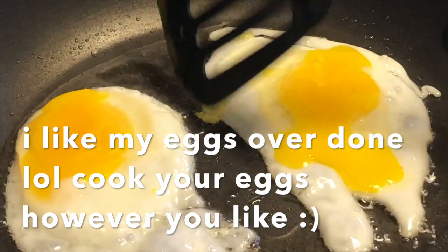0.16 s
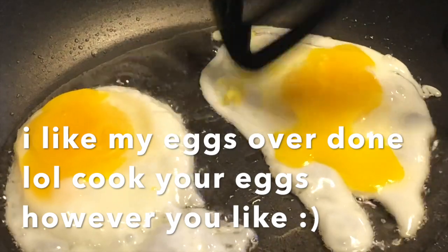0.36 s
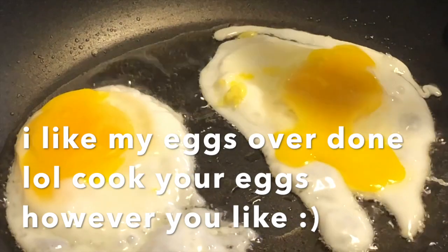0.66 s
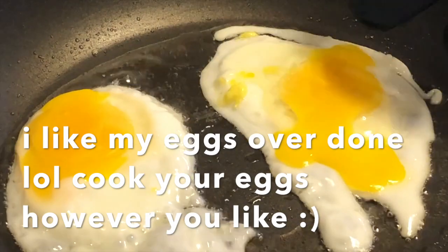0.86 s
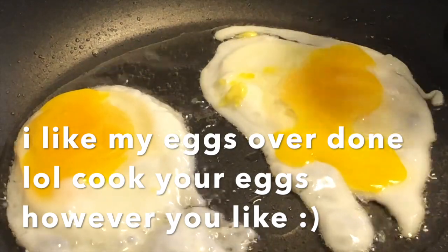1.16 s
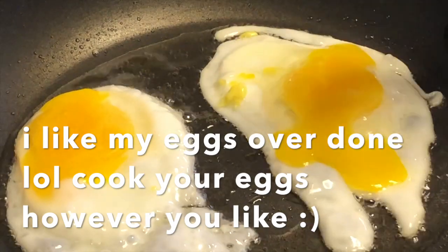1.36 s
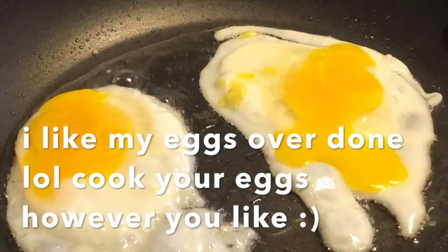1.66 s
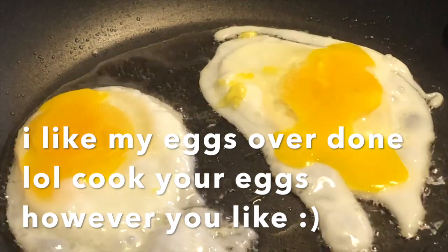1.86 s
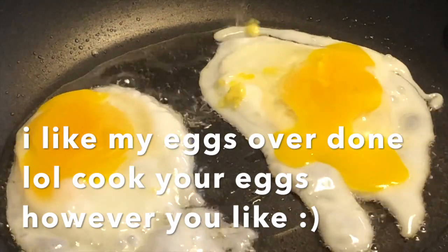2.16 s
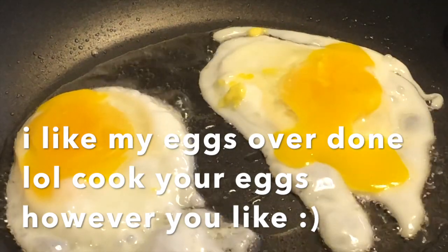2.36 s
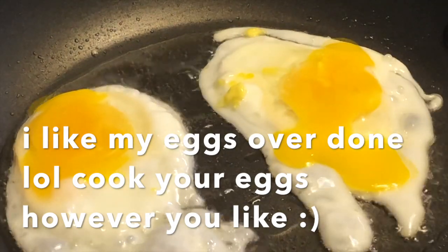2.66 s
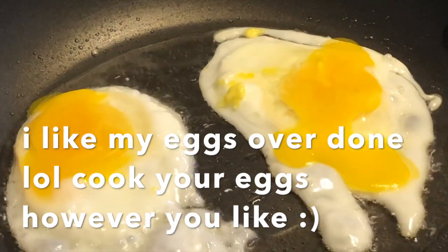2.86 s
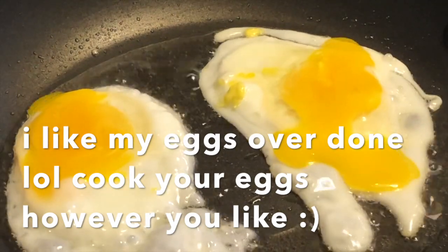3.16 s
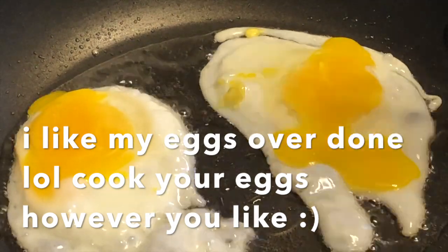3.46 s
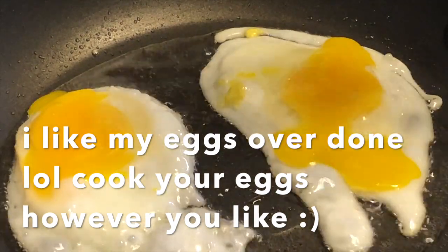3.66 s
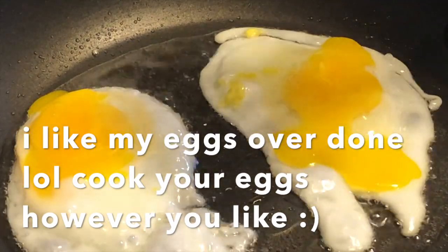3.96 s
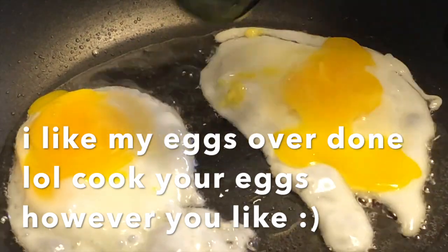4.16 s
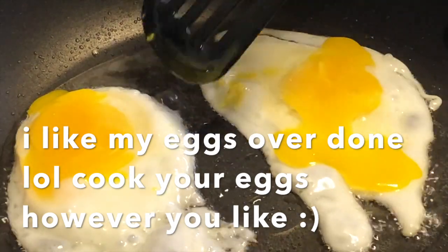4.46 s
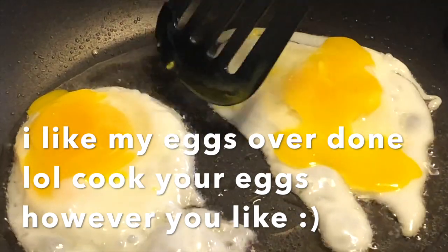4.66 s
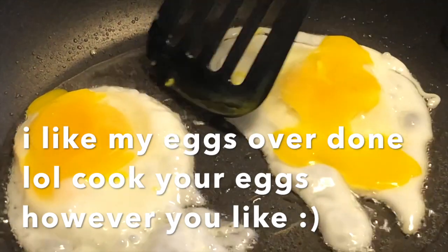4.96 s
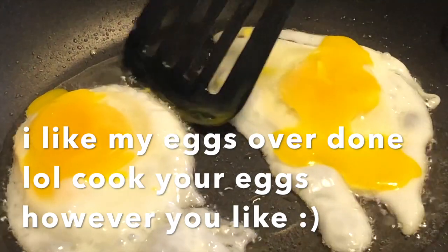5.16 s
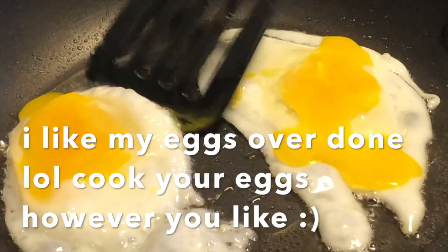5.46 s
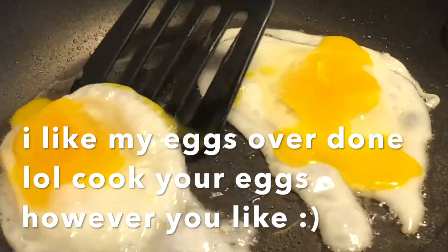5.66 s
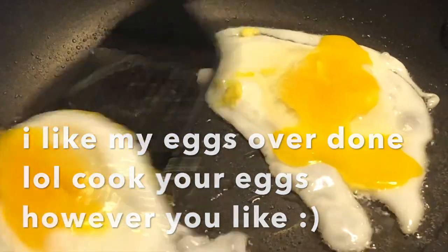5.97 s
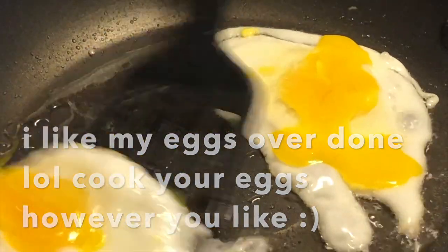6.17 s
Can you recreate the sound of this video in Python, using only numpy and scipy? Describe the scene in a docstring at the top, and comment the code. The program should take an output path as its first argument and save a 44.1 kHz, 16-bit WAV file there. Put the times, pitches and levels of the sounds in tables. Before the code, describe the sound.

Close, steady frying of eggs with sharp crackles and spits, then soft knocks and wet scrapes of a plastic spatula.

```python
"""Small kitchen: two eggs fry in a little oil, heard close up.
Tiny bubbles fizz and tick, larger ones pop; trapped water spits out as short steam jets that ring the pan.
A plastic spatula taps the pan and shoves under an egg.
Mains hum and room rumble lie beneath; the level dips briefly midway."""
import sys
import numpy as np
from scipy import signal
from scipy.fft import rfft, irfft, next_fast_len
from scipy.io import wavfile
from scipy.ndimage import uniform_filter1d, map_coordinates

SR = 44100
rng = np.random.default_rng(int(sys.argv[2]) if len(sys.argv) > 2 else 0)


def to_wav(sig):
    """Store sig (one row per channel, or 1-D mono) as 16-bit WAV at the path in sys.argv[1].

    Samples outside -1..1 are clipped; the rate is SR.
    """
    pcm = np.clip(np.atleast_2d(sig), -1, 1) * 32767
    pcm = np.round(pcm).astype(np.int16)
    wavfile.write(sys.argv[1], SR, pcm.T)  # frames by channels


N = 278690

# frying strength: t/s, bubbling/dB, fizz/dB
FRY_LEVELS = [(0.0, -57, -56), (0.21, -56.5, -56.5), (1.07, -59, -56), (2.52, -56.5, -56),
              (3.03, -61, -60.5), (3.82, -55.5, -55), (4.21, -57, -57), (5.32, -59, -57),
              (5.53, -55.5, -55), (5.81, -56, -54), (6.09, -53.5, -51), (6.32, -52.5, -53)]
# spectra: f/Hz, relative level/dB
SIMMER_SPECTRUM = [(200, -13), (500, -5.5), (900, -2), (2500, 0), (4000, -11), (7000, -2.5), (16000, -13)]
FIZZ_SPECTRUM = [(1000, -6), (3500, 4), (5200, 3.5), (7000, -3.5), (9500, 6), (12000, 2.5), (15000, 6),
                 (16000, -5.5)]
RUMBLE_SPECTRUM = [(20, -45), (40, -13), (70, -9), (110, -4), (150, 2), (200, -3.5), (320, -5), (500, -9.5),
                   (1000, -16.5), (4000, -31)]
JET_SPECTRUM = [(30, -31), (100, -44), (400, -22.5), (800, -17.5), (1500, -12), (2100, -3), (2800, -1),
                (3500, -7), (6000, -2), (8800, -3), (11000, -3), (13000, -13), (16000, 4.5)]
SNAP_SPECTRUM = [(100, -45), (800, -22), (4000, -7), (7000, 0), (10500, 0), (16000, -5)]
RUB_SPECTRUM = [(40, -30), (95, -9), (145, 0), (200, -5), (400, -6), (700, -18), (3000, -40)]
REVERB_SPECTRUM = [(300, 6), (3000, 1.5), (9000, -2.0), (15000, 1.5)]
# room decay: f/Hz, t60/s
ROOM_DECAY = [(200, 0.09), (800, 0.23), (2500, 0.24), (8000, 0.29), (15000, 0.14)]
# loud bursting bubbles, plus at 0.7393 s the crack that opens the steam jet just after: t/s, body/dB, f/Hz,
# t60/s, snap/dB
LOUD_POPS = [(0.0661, -43, 2320, 0.043, -54), (0.1393, -47.5, 5400, 0.011, -52.5),
             (0.2666, -43.5, 1410, 0.041, -63), (0.2669, -44.5, 778, 0.13, -70),
             (.3135, -72, 1420, .025, -49.5), (0.3466, -49, 1910, 0.014, -73),
             (0.5696, -45.5, 5130, 0.013, -68), (0.6306, -44.5, 970, 0.014, -70),
             (.6403, -47, 3100, .019, -50), (0.6475, -44.5, 1330, 0.051, -47),
             (0.7309, -39.5, 3770, 0.0083, -65), (.7393, -55, 2420, .01, -38),
             (0.9922, -47, 5180, 0.015, -72), (1.023, -51.5, 1980, 0.01, -54),
             (1.1347, -49, 3280, 0.0061, -63), (1.1552, -73, 5600, .016, -46.5),
             (1.598, -46, 1670, 0.02, -50), (1.633, -49.5, 4300, 0.013, -54),
             (1.658, -46.5, 4440, 0.012, -69), (1.8082, -42.5, 1697, 0.029, -43),
             (1.814, -44.5, 1770, .015, -47.5), (1.8952, -45.5, 850, 0.02, -45.5),
             (2.0024, -43, 1520, 0.002, -54), (2.0252, -47.5, 6860, 0.018, -63),
             (2.2192, -33, 1800, .006, -53), (2.2498, -54, 1800, .007, -37.5),
             (2.33, -48.5, 1630, 0.022, -67), (2.3539, -46.5, 2220, 0.022, -52),
             (2.3751, -43, 2120, 0.0057, -66), (3.3868, -40.5, 1590, 0.0029, -60),
             (3.3871, -44, 4800, 0.0049, -70), (3.405, -45.5, 6340, 0.023, -62),
             (3.429, -46, 5100, .01, -50), (3.4392, -38.5, 6760, 0.0068, -44),
             (3.4803, -43.5, 1700, 0.034, -61), (3.6399, -49, 1800, 0.0078, -50),
             (3.7904, -44.5, 5340, 0.026, -52), (3.8325, -40, 1560, 0.0039, -40.5),
             (3.9131, -40, 1770, 0.018, -34), (4.404, -47.5, 5000, .004, -57),
             (4.505, -47.5, 1710, .006, -48.5), (4.538, -49, 2720, 0.013, -72),
             (4.6086, -39.5, 2420, 0.035, -64), (4.8075, -69, 5540, .009, -45),
             (4.867, -47, 5300, 0.012, -33.5), (5.5952, -50.5, 1630, 0.013, -48.5),
             (5.6723, -47, 6900, .015, -67), (5.9651, -50, 2290, .011, -49),
             (6.2488, -34.5, 2500, 0.0018, -42.5)]
# sympathetic pan modes: f/Hz, width/Hz, gain/dB
PAN_MODES = [(902, 7.6, 16), (2150, 11, 11.5), (2660, 30, -24), (2827, 28, -45), (5043, 38, 15.5),
             (6640, 40, 9), (7600, 40, -21), (7800, 32, -27), (9200, 56, 16), (9183, 40, -20),
             (11400, 78, 9)]
# steam jets: t/s, length/s, level/dB, extra treble/dB, vent/Hz
STEAM_JETS = [(0.7395, .016, -21.5, 11, 3700), (2.219, 0.01, -26.5, -24, 5850),
              (2.225, 0.0073, -21.5, 7, 10400), (3.431, 0.015, -37, -11, 9350),
              (3.451, 0.0084, -32.5, 4, 6550), (3.479, 0.0054, -36.5, 5, 4770),
              (5.4171, .0053, -13.5, 1, 9000), (5.423, 0.011, -20.5, 13, 6800),
              (5.439, 0.013, -24, -11, 4300), (5.502, 0.0067, -31, -21, 5250),
              (5.913, 0.007, -37.5, -18, 2900), (5.93, 0.016, -40, -2, 8300), (6.02, 0.019, -31, -5, 9800),
              (6.102, 0.0028, -13, 6, 8500), (6.106, 0.027, -33.5, -9, 1780),
              (6.15, 0.003, -30.5, 10, 9000)]
# spatula on pan: t/s, level/dB, brightness/Hz
SPATULA_TAPS = [(5.3037, -38, 1600), (5.3098, -34.5, 1330), (5.4237, -38, 840), (5.4405, -42.5, 294),
                (5.5095, -51, 726), (5.535, -46.5, 135), (5.79, -43, 135), (6.1045, -35.5, 1250),
                (6.106, -41, 500), (6.117, -36.5, 1470), (6.2495, -53, 400)]
# modes of a tap: f/Hz, relative level/dB, t60/s
TAP_MODES = [(141.6, 1.5, 0.24), (310, -11, 0.058), (490, -25, 0.051), (842, -5, 0.06), (1160, -14, 0.026),
             (1310, -9, 0.053), (1620, -12, 0.078), (2780, 1, 0.027), (3553, -7, 0.023)]
# spatula under egg: t/s, length/s, rub/dB, scrape/dB
SPATULA_STROKES = [(5.437, 0.028, -59, -62), (5.51, 0.056, -52.5, -55), (5.69, 0.069, -57.5, -54.5),
                   (5.772, 0.1, -54.5, -61), (5.98, 0.05, -66, -51), (6.12, 0.04, -65, -41)]

TOP_HZ = 15800


def amp(db):
    """dB to gain."""
    return 10 ** (np.asarray(db) / 20)


def unit(x):
    """Scale to rms 1."""
    return x / np.sqrt(np.mean(x ** 2) + 1e-20)


def along(points, hz):
    """Interpolate (f/Hz, value) points on a log axis."""
    f, v = np.transpose(points)
    return np.interp(np.log(hz + 1), np.log(f + 1), v)


def curves(rows):
    """Per-sample curve for each column after t/s."""
    times_s, *columns = np.transpose(rows)
    return [np.interp(np.arange(N) / SR, times_s, column) for column in columns]


def wobble(rate_hz):
    """Smooth random curve, knots at rate_hz."""
    knots = rng.standard_normal(int(N * rate_hz / SR) + 4)
    return map_coordinates(knots, [np.arange(N) * rate_hz / SR])


def coloured(x, gain_db):
    """Minimum-phase filter with response gain_db(hz)."""
    n = 2 * next_fast_len(len(x) // 2 + 2048)
    cepstrum = irfft(np.log(amp(gain_db(np.fft.rfftfreq(n, 1 / SR)))), n)
    cepstrum[1:n // 2] *= 2
    cepstrum[n // 2 + 1:] = 0
    return irfft(rfft(x, n) * np.exp(rfft(cepstrum)), n)[:len(x)]


def noise(spectrum):
    """Shaped noise, rms 1."""
    return unit(coloured(rng.standard_normal(N), lambda hz: along(spectrum, hz)))


def add(track, start_s, sound):
    """Mix sound into track."""
    part = track[max(round(start_s * SR), 0):][:len(sound)]
    part += sound[:len(part)]


def blip(x, db, window_s=0.01):
    """Scale x to the energy of db rms held for window_s."""
    return x * amp(db) * np.sqrt(window_s * SR / (np.sum(x ** 2) + 1e-20))


def grains(per_s, pitch_hz, log_spread, t60_cycles, scatter_db):
    """Cloud of damped sines, rms 1; scatter_db makes a few stand out."""
    when, pitch_a, pitch_b, strength = rng.random((int(per_s * N / SR), 4)).T[:, :, None]
    hz = np.clip(pitch_hz * np.exp(log_spread * (pitch_a + pitch_b - 1)), 200, TOP_HZ)
    size = amp(-scatter_db * np.log(0.04 + 0.96 * strength))
    k = np.arange(384)
    turns = hz * k / SR
    swell = 1 - np.exp(-turns)
    waves = size * np.sin(2 * np.pi * turns) * swell * amp(-60 * turns / t60_cycles)
    samples = (when * N).astype(int) + k
    return unit(np.bincount(samples.ravel(), waves.ravel(), N)[:N])


def sizzle(bubbling_trim_db=0.3, fizz_trim_db=-0.16):
    """Bubbles simmer under the whites; fine droplets fizz in the open oil."""
    bubbling_db, fizz_db = curves(FRY_LEVELS)
    boil = wobble(12)
    simmer = noise(SIMMER_SPECTRUM) * amp(-4.5 + 2.0 * boil)
    bubbles = grains(per_s=380, pitch_hz=2310, log_spread=1.363, t60_cycles=18, scatter_db=5.5)
    bubbles = (bubbles + amp(-6.5) * kitchen(bubbles)) * amp(-4.5 + 0.6 * boil)
    flicker_db = 0.8 * boil + 0.5 * wobble(45)
    hiss = noise(FIZZ_SPECTRUM) * amp(flicker_db - 0.45)
    ticks = grains(per_s=420, pitch_hz=9900, log_spread=0.95, t60_cycles=4.6, scatter_db=10)
    bubbling = amp(bubbling_db + bubbling_trim_db) * (simmer + bubbles)
    fizz = amp(fizz_db + fizz_trim_db) * (hiss + amp(-8.5) * ticks)
    return bubbling + fizz


def kitchen(x, build_s=0.0038):
    """Reverb of a small hard room; lows and top treble die first."""
    hz, t, spectra = signal.stft(rng.standard_normal(SR // 2), SR, nperseg=256)
    colour = amp(along(REVERB_SPECTRUM, hz))[:, None]
    decay = amp(-60 * t / along(ROOM_DECAY, hz)[:, None])
    tail = signal.istft(spectra * colour * decay, SR, nperseg=256)[1]
    tail *= 1 - np.exp(-np.arange(len(tail)) / SR / build_s)
    return signal.fftconvolve(x, tail / np.linalg.norm(tail))[:N]


def hum_and_rumble(mains_hz=59.9, hum_db=-58.5, rumble_db=-59.5, dip_at_s=2.92, dip_width_s=0.15):
    """Mains hum and low room noise; both dip briefly, the hum deeper."""
    t = np.arange(N) / SR
    dip = np.exp(-np.abs(t - dip_at_s) / dip_width_s)
    hum = amp(hum_db - 21 * dip + 0.37 * wobble(6.5)) * np.sin(2 * np.pi * mains_hz * t)
    rumble = amp(rumble_db - 6.5 * dip + 1.9 * wobble(7.8)) * noise(RUMBLE_SPECTRUM)
    return hum + rumble


def pop(body_db, hz, t60_s, snap_db, glide=0.027, waver=0.098):
    """A bubble's film snaps, its cavity rings, the oil splashes back."""
    t = np.arange(SR // 8) / SR
    splash, snap, shake = rng.standard_normal((3, len(t)))
    fade = amp(-60 * t / max(t60_s, 0.002))
    # collapsing cavity: pitch rises and wanders
    turns = hz * t * (1 + glide * (1 - fade)) + waver * np.cumsum(shake) * np.sqrt(hz / SR)
    cavity = np.sin(2 * np.pi * turns) * fade * (1 - np.exp(-2 * hz * t))
    splash_spectrum = [(40, -45), (200, -22), (900, -7), (max(0.74 * hz, 950), -2),
                       (max(0.97 * hz, 1000), 0), (1.8 * hz, -9), (16000, -32)]
    splash *= fade + 0.48 * amp(-60 * t / 0.039)
    splash = coloured(splash, lambda f: along(splash_spectrum, f))
    # a violent snap tears the cavity: more splash than tone
    splash_db = np.clip(2 + 0.45 * (snap_db - body_db), -4, 8)
    snap *= amp(-60 * t / 0.0015) + 0.06 * amp(-60 * t / 0.035)  # burst, then scatter in the pan
    snap = coloured(snap, lambda f: along(SNAP_SPECTRUM, f))
    return blip(unit(cavity) + amp(splash_db) * unit(splash), body_db) + blip(snap, snap_db)


def pops(faint_per_s=6, faint_hz=1717, spread_oct=0.707, faint_t60_s=0.018, scatter_db=0.3):
    """Loud bubbles burst at set times, and one crack opens a steam jet; faint ones burst at random, following
    the bubbling level."""
    out = np.zeros(N)
    for start_s, body_db, hz, t60_s, snap_db in LOUD_POPS:
        add(out, start_s, pop(body_db, hz, t60_s, snap_db))
    bubbling_db = curves(FRY_LEVELS)[0]
    count = int(faint_per_s * N / SR)
    starts = rng.integers(N, size=count)
    deviations = np.clip(rng.standard_normal((count, 3)), -2, 2)
    for at, (pitch, body, snap) in zip(starts, deviations):
        body_db = bubbling_db[at] + 4.5 + scatter_db * body
        snap_db = bubbling_db[at] - 0.5 + scatter_db * snap
        add(out, at / SR, pop(body_db, faint_hz * 2 ** (spread_oct * pitch), faint_t60_s, snap_db))
    return out


def pan(x):
    """The pan rings thinly in sympathy."""
    n = next_fast_len(N + SR // 2)
    f = np.fft.rfftfreq(n, 1 / SR)
    response = sum(amp(db) * f * width_hz / (hz * hz - f * f + 1j * f * width_hz)
                   for hz, width_hz, db in PAN_MODES)
    return irfft(rfft(x, n) * response, n)[:N]


def steam_jets(attack_s=0.0012, t60_s=0.025, rough_db=2.5, vent_db=7.5, vent_oct=0.18):
    """Water flashes to steam: a ragged jet hisses through its vent, then collapses."""
    out, t = np.zeros(N), np.arange(SR // 10) / SR
    for start_s, length_s, db, treble_db, vent_hz in STEAM_JETS:
        jet, flutter = rng.standard_normal((2, len(t)))
        jet *= amp(rough_db * unit(uniform_filter1d(flutter, size=40)))
        bass_db = -0.21 * (db + 19)  # stronger jets are thinner
        tilt = [(2000, bass_db), (4500, 0), (9500, 0), (13000, treble_db), (15000, min(treble_db, -6))]
        vent = lambda hz: vent_db * np.exp(-(np.log2((hz + 1) / vent_hz) / vent_oct) ** 2)
        jet = unit(coloured(jet, lambda hz: along(JET_SPECTRUM, hz) + along(tilt, hz) + vent(hz)))
        flow = (1 - np.exp(-t / attack_s)) * amp(-60 * np.maximum(t - length_s, 0) / t60_s)
        add(out, start_s, amp(db) * flow * jet)
    return out


def spatula_taps(scatter_db=5.5, contact_t60_s=0.025):
    """Soft plastic knocks the pan; contact stiffness picks which modes speak."""
    out, t = np.zeros(N), np.arange(SR // 4) / SR
    for start_s, db, bright_hz in SPATULA_TAPS:
        ring = np.zeros(len(t))
        for hz, mode_db, t60_s in TAP_MODES:
            decay = amp(mode_db + rng.normal(0, scatter_db) - 60 * t / t60_s)
            ring += decay * np.sin(2 * np.pi * (hz * t + rng.random()))
        contact = 4.2 * amp(-60 * t / contact_t60_s) * rng.standard_normal(len(t))
        focus = [(bright_hz / 8, -36), (bright_hz / 2, -17), (bright_hz, 0),
                 (2 * bright_hz, -12), (12 * bright_hz, -42)]
        add(out, start_s, blip(coloured(ring + contact, lambda hz: along(focus, hz)), db))
    return out


def spatula_strokes(attack_s=0.0058, t60_s=0.13):
    """The spatula rubs along the pan floor; wet egg slides in spurts of tiny slips."""
    rub_gain, scrape_gain = np.zeros((2, N))
    t = np.arange(SR // 2) / SR
    for start_s, length_s, rub_db, scrape_db in SPATULA_STROKES:
        push = (1 - np.exp(-t / attack_s)) * amp(-60 * np.maximum(t - length_s, 0) / t60_s)
        add(rub_gain, start_s, amp(rub_db) * push)
        add(scrape_gain, start_s, amp(scrape_db) * push)
    rub = noise(RUB_SPECTRUM)
    slips = grains(per_s=770, pitch_hz=6530, log_spread=1.15, t60_cycles=8.3, scatter_db=0)
    spurts = amp(4.1 * wobble(43))
    return rub_gain * rub + scrape_gain * unit(slips * spurts)


def scene(pan_db=-13, room_db=-12):
    """Pops, jets and spatula excite pan and room, over sizzle, hum and rumble; mono."""
    close = pops() + steam_jets() + spatula_taps() + spatula_strokes()
    close += amp(pan_db) * pan(close)
    return (close + amp(room_db) * kitchen(close) + sizzle() + hum_and_rumble())[None]


def record(dry):
    """Steep low-pass at TOP_HZ."""
    n = next_fast_len(N + SR // 2)
    lowpass = 1 / (1 + (np.fft.rfftfreq(n, 1 / SR) / TOP_HZ) ** 160)
    return irfft(rfft(dry, n) * lowpass, n)[..., :N]


dry = scene()
out = record(dry)
to_wav(out)
```